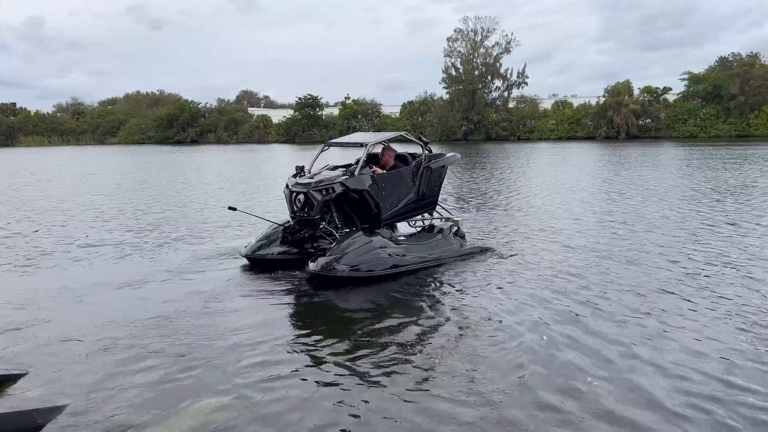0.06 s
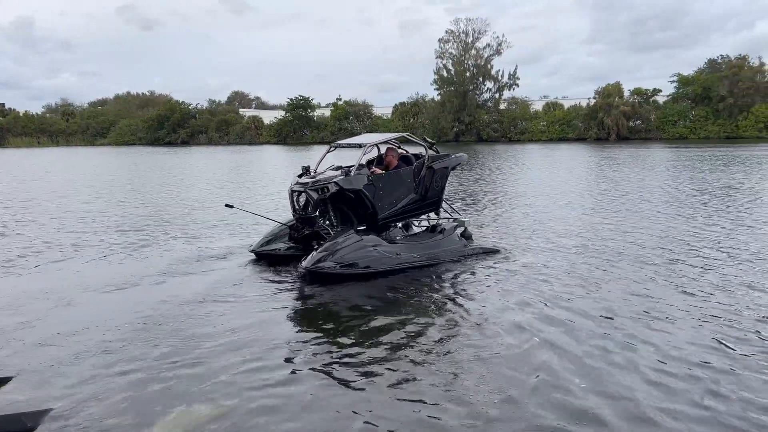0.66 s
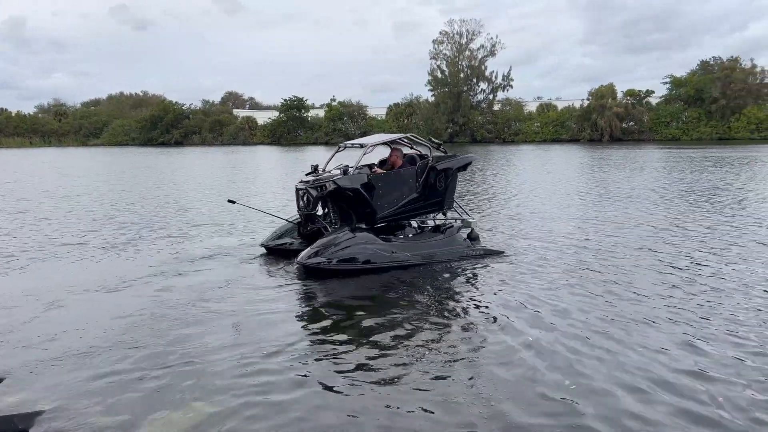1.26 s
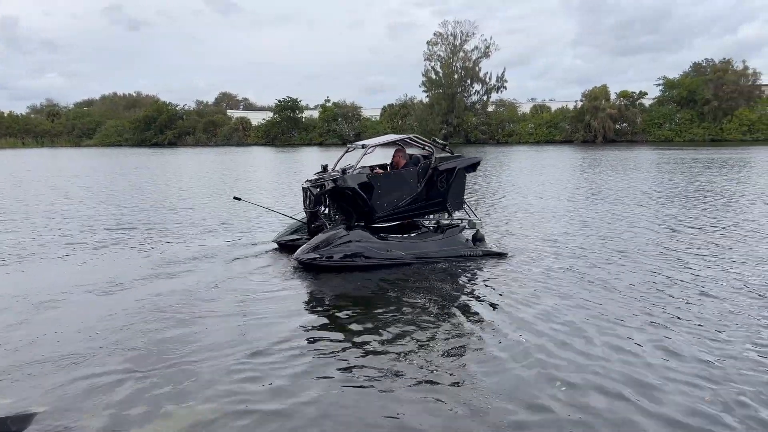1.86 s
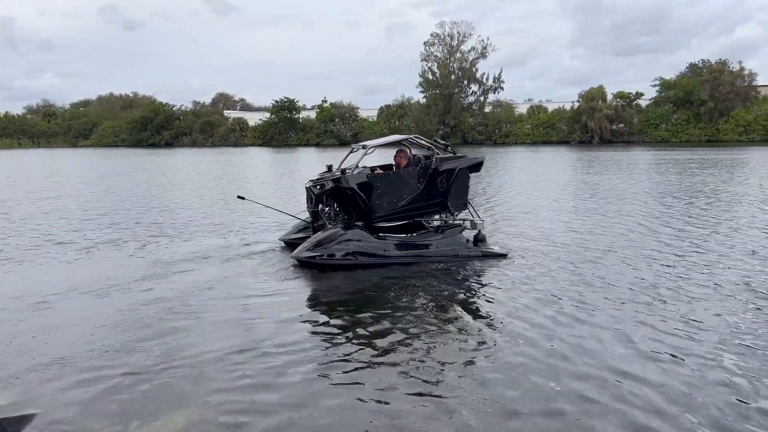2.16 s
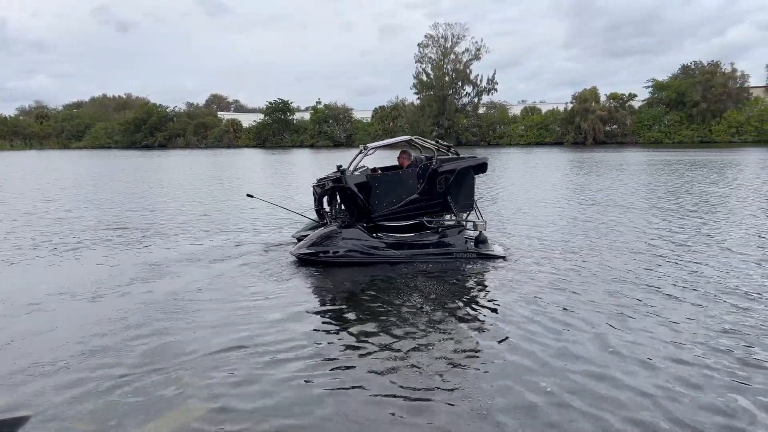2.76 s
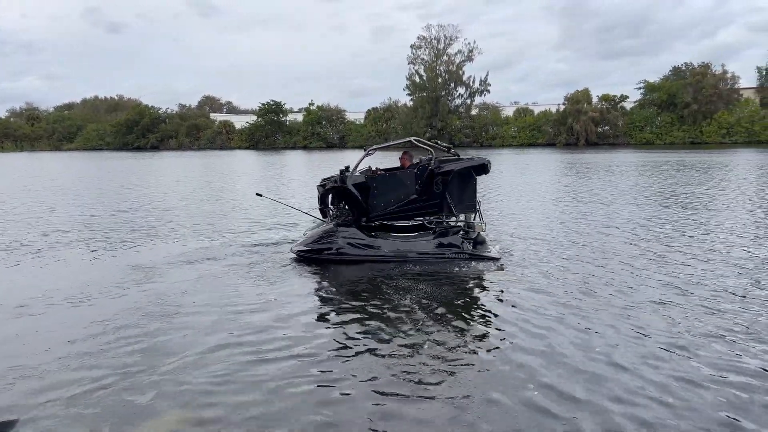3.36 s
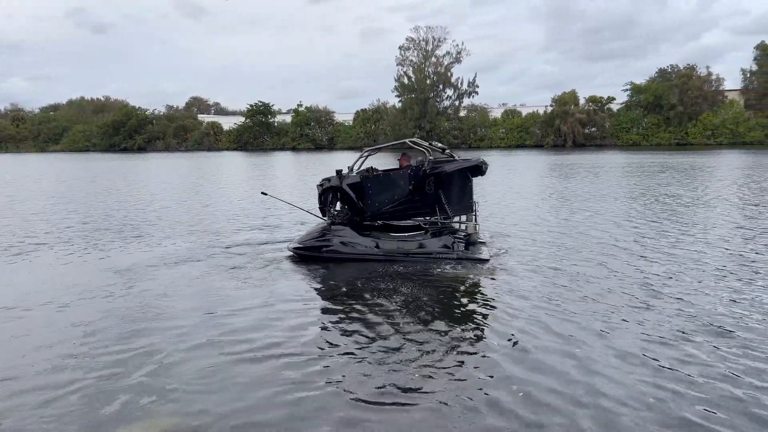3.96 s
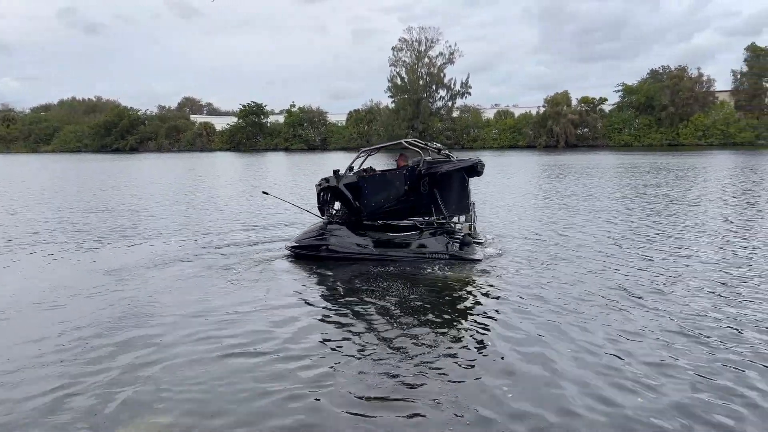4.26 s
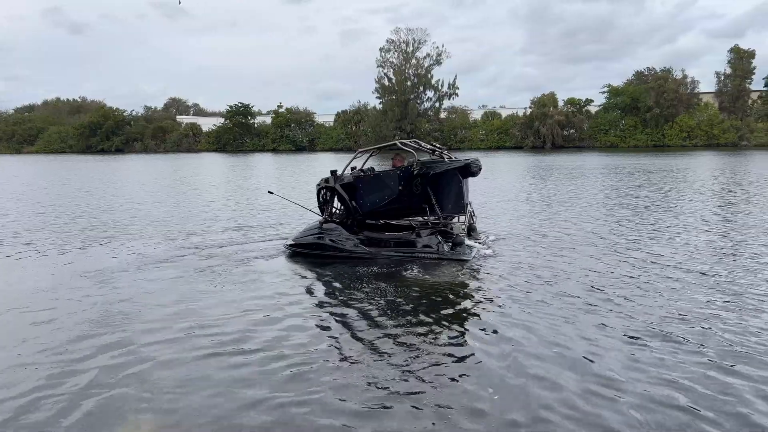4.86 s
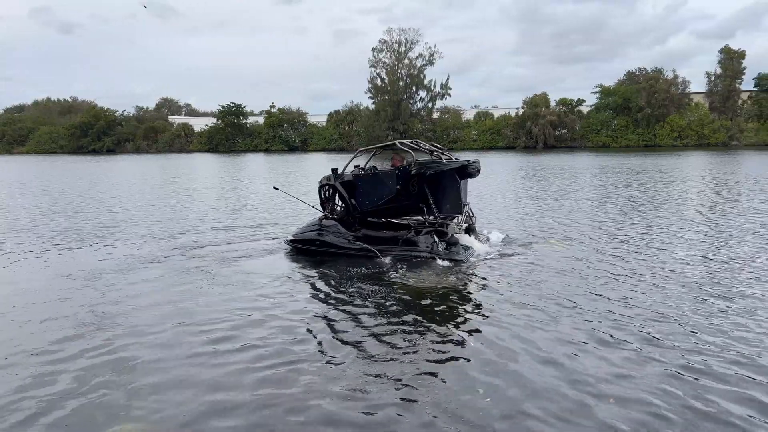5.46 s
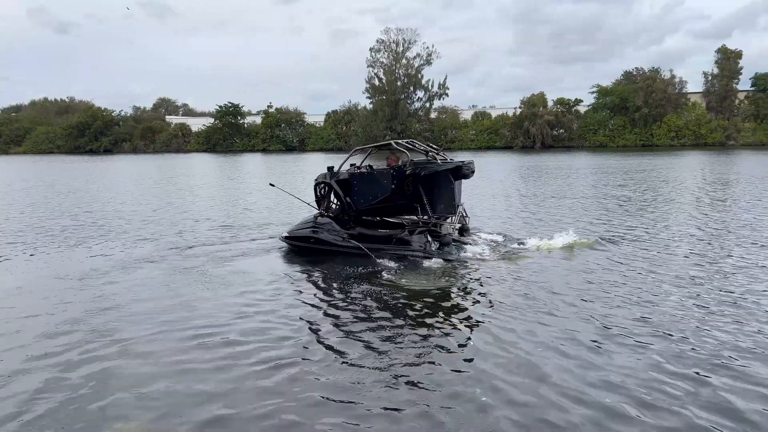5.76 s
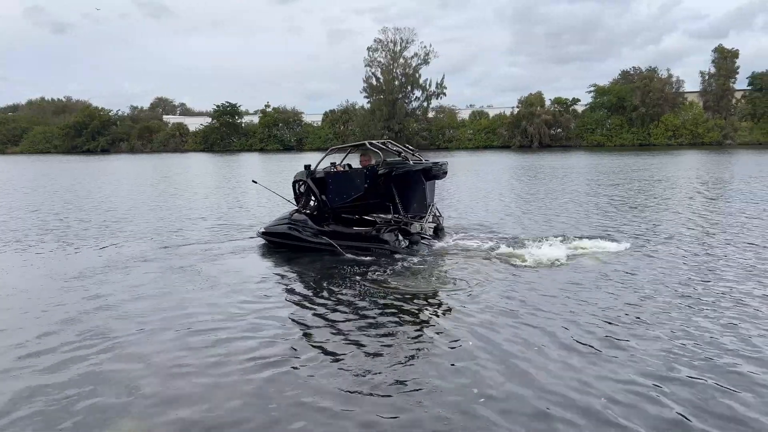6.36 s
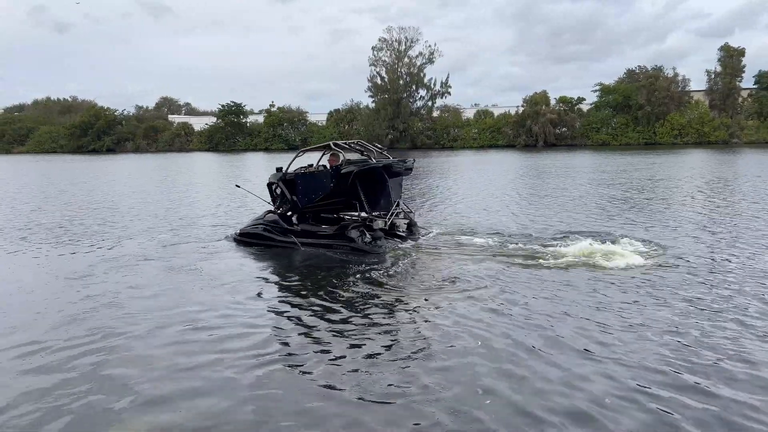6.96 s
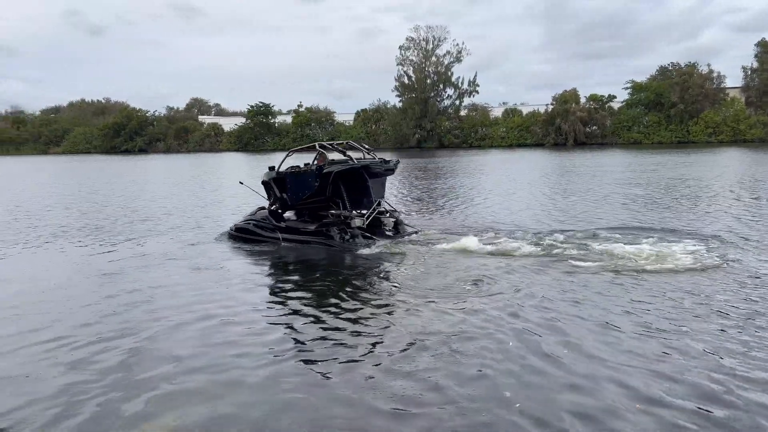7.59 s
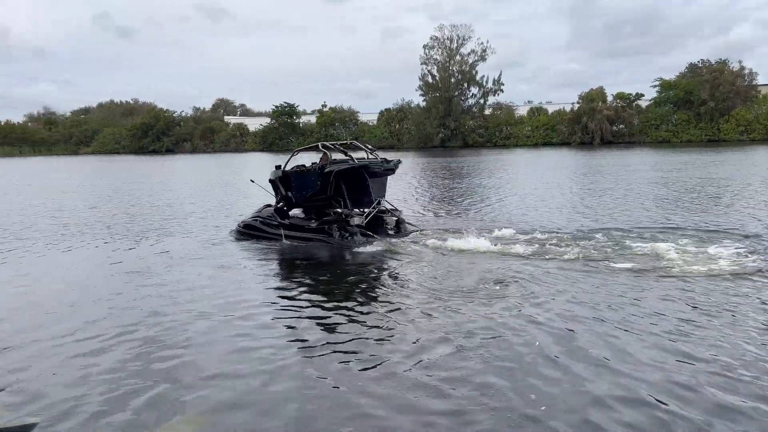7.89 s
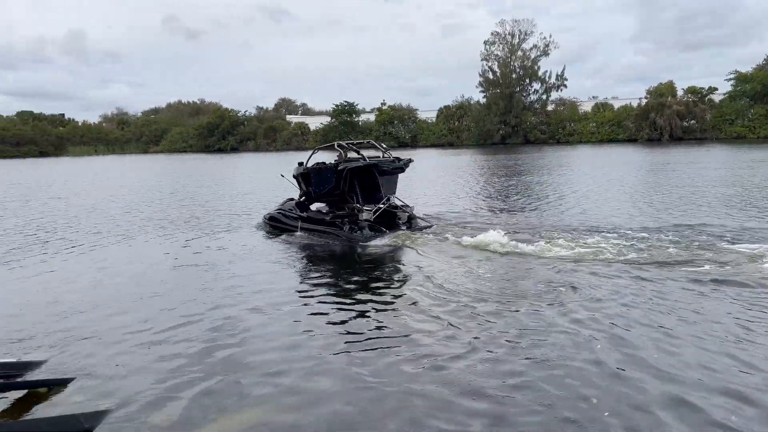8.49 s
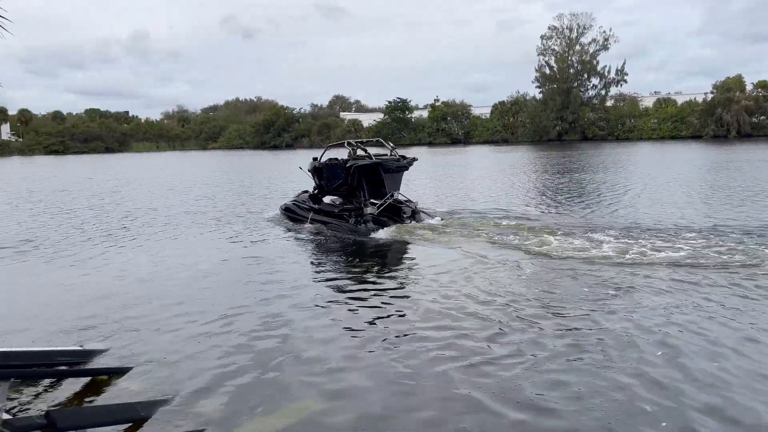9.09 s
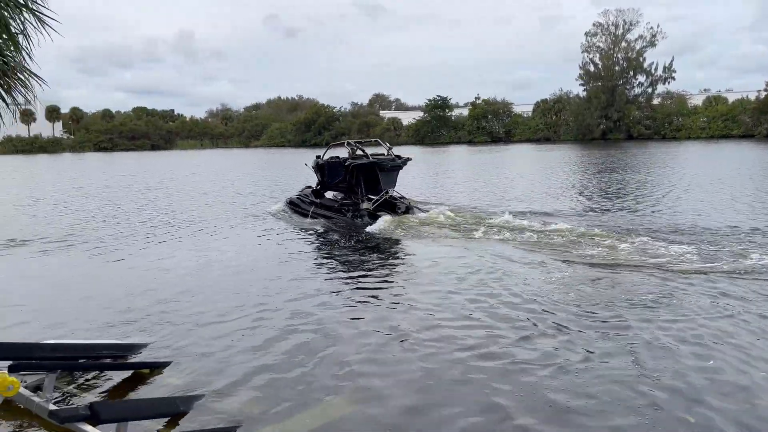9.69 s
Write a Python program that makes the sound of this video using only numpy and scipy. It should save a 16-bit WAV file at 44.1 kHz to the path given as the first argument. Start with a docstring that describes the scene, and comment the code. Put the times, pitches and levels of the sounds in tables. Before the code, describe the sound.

Two watercraft engines burble at a lumpy idle on a lake, rev up in steps, then pull away on a higher note with spray.

```python
"""Two engines burble down to a lumpy idle, heard from a lake shore on a phone's two microphones.
They drive a buggy body on two water-scooter hulls, which is revved in steps and pulls away.
The engines never quite agree, so their exhaust notes beat; at low speed the outlets bubble in the water.
Engine clatter rings the hulls, the jets throw spray, a pump sings faintly, drops tick and wavelets slap.
The phone limits the peaks."""
import sys
import numpy as np
from scipy import signal
from scipy.fft import rfft, irfft
from scipy.io import wavfile
from scipy.ndimage import uniform_filter1d, minimum_filter1d

SR = 44100
rng = np.random.default_rng(int(sys.argv[2]) if len(sys.argv) > 2 else 0)


def to_wav(s):
    """Save 16-bit WAV."""
    ch = np.atleast_2d(s).T  # columns
    pcm = np.round(np.clip(ch, -1, 1) * 32767)  # PCM
    wavfile.write(sys.argv[1], SR, pcm.astype(np.int16))


N = 429093
T = np.arange(N) / SR
IDLE_HZ = 50  # firing rate


def undb(db):
    """Decibels to gain."""
    return 10 ** (np.asarray(db) / 20)


def curves(table):
    """Each column of a table, joined by straight lines in time."""
    s, *columns = np.transpose(table)
    return [np.interp(T, s, column) for column in columns]


def swell(peak_s, rise_s, fall_s):
    """Rises from 0 to 1 and falls back."""
    return np.interp(T, [peak_s - rise_s, peak_s, peak_s + fall_s], [0, 1, 0])


def delayed(x, lag_s):
    """The same sound a little later."""
    return np.interp(T - lag_s, T, x, left=0)


def colour(x, points):
    """Causal filter through (Hz, dB) points, built from the cepstrum of its log gain."""
    size = 8192
    hz, db = np.transpose(points)
    bin_hz = np.arange(size // 2 + 1) * SR / size
    gain = undb(np.interp(np.log(bin_hz + 1), np.log(hz), db))
    cepstrum = irfft(np.log(gain))
    cepstrum[1:size // 2] *= 2
    cepstrum[size // 2 + 1:] = 0
    return signal.oaconvolve(x, irfft(np.exp(rfft(cepstrum))))[:N]


def steady(x, size=16384):
    """Scale to a running rms of 1."""
    return x / np.sqrt(uniform_filter1d(uniform_filter1d(x ** 2, size), size) + 1e-18)


def walk(per_s):
    """Smooth random wander with a spread near 1."""
    hold = int(SR / per_s)
    steps = np.repeat(rng.standard_normal(N // hold + 1), hold)[:N]
    return np.sqrt(2) * uniform_filter1d(uniform_filter1d(steps, hold), hold)


def grains(per_s, spread_db):
    """Clicks at random moments and of random sizes."""
    count = int(per_s * N / SR)
    size, loudness = rng.standard_normal((2, count))
    clicks = np.bincount(rng.integers(0, N, count), size * undb(spread_db * loudness), N)
    return clicks / np.std(clicks)


# Width at the microphones. Each row: frequency in Hz, gain of the scattered sound in dB.
STEREO_WIDTH = [(60, 3.5), (150, -15), (300, -14), (700, -4.5), (1500, -3.5), (3000, -3.5), (6000, 0),
                (12000, 1)]


def at_mics(direct, scattered):
    """Direct sound is shared and reaches the left microphone first; scattered sound differs."""
    side = colour(scattered, STEREO_WIDTH)
    return np.array([direct + side, np.pad(direct - side, (1, 0))[:N]])


# Lumpy and half drowned at idle; on a sudden throttle every other firing is weak (lope).
# Each row: time in seconds, then roughness, share of the bark under water and lope, all from 0 to 1.
ENGINE_MANNER = [(0, .3, .7, .2), (.4, .35, .75, .2), (.6, .52, .84, .2), (3.4, .5, .84, .2),
                 (4.3, .5, .72, .2), (5.0, .45, .68, .2), (5.17, .3, .48, .5), (5.3, .4, .5, .6),
                 (5.43, .4, .42, .85), (5.58, .42, .65, .3), (5.74, .3, .5, .3), (5.86, .16, .3, .45),
                 (6.2, .2, .36, .6), (6.55, .48, .55, .2), (6.8, .32, .42, .1), (7.3, .3, .34, .1),
                 (7.62, .36, .55, .1), (7.85, .11, .23, .05), (8.3, .1, .21, .05), (8.7, .12, .3, .12),
                 (9.73, .12, .28, .12)]


def firings(cycles, rough, scatter=.9, jitter_cycles=.06, lope=.32, open_share=.23):
    """A port opens once a cycle, strong and weak in turn; rough running scatters size and timing."""
    count, phase = np.divmod(cycles + jitter_cycles * rough * walk(70), 1)
    chance = rng.uniform(-1, 1, 2000)[count.astype(int)]
    size = np.maximum(1 + rough * (scatter * chance + lope * np.cos(np.pi * count)), 0)
    return size * np.sin(np.pi * np.minimum(phase / open_share, 1)) ** 2


def puffs(pulses, decay_s):
    """The gas pressure that follows each firing and dies away."""
    return steady(signal.lfilter([1], [1, -np.exp(-1 / (decay_s * SR))], pulses))


# The silencers, the pipes and gas in water. Each row: frequency in Hz, gain in dB.
SILENCER_RESPONSE = [(18, -39.5), (33, -19.5), (47, -1.5), (70, 5.5), (105, 1.5), (122, -0.5), (150, -24.5),
                     (220, -28), (500, -70)]
PIPE_RESPONSE = [(70, -35), (115, -11), (140, 1), (180, 3), (212, 0), (262, -6.5), (300, 0), (330, -1),
                 (355, -9), (400, -18.5), (500, -14), (600, -11.5), (730, -7.5), (1000, -26.5), (2500, -59)]
BURBLE_RESPONSE = [(30, -31), (70, -6.5), (120, 0), (150, -2.5), (195, 2), (250, 0.5), (310, -7), (370, -8),
                   (450, -17), (700, -34.5), (2000, -75.5)]
# Which outlet the shore hears more as the craft turns.
# Each row: time in seconds, the second engine's boom and its bark in dB over the first's.
OUTLET_BALANCE = [(.55, -2, -2), (1, -5, -5), (3.3, -6, -5), (3.7, -1.5, -3), (4.2, -6, -3),
                  (5.0, -6, -7.5), (5.3, -5, -6), (5.8, -7, -7), (6.9, -4, -5), (7.6, -4.5, -5),
                  (8.3, -9, 0.5), (8.75, -6, 2.5), (9.35, -10, 2.5), (9.6, -4.5, -2)]


def exhausts(lead, second, cycles, boom_db, bark_db):
    """Firings boom in the silencers and bark in the pipes; drowned outlets bubble through water."""
    rough, wet, lope = curves(ENGINE_MANNER)
    second_boom_db, second_bark_db = curves(OUTLET_BALANCE)
    pulses = lead + undb(second_boom_db) * second
    boom = steady(colour(pulses - pulses.mean(), SILENCER_RESPONSE)) * undb(boom_db)
    bank_echo = undb(-18) * delayed(boom, lag_s=.031)
    outlets = lead * (1 + lope * np.cos(np.pi * cycles)) + undb(second_bark_db) * second
    choke = undb(4 * rough * walk(14))  # water washes over the outlets
    bark = steady(colour(outlets - outlets.mean(), PIPE_RESPONSE) * choke)
    chug = 1 + .7 * rough * np.cos(np.pi * cycles / 2)  # a gulp of gas once in four firings
    gas = puffs(np.sqrt(outlets) * chug, decay_s=.017)
    burble, scattered = (steady(colour(gas * grains(per_s=3000, spread_db=1), BURBLE_RESPONSE))
                         for _ in range(2))
    pipes = at_mics(np.sqrt(1 - wet ** 2) * bark + wet * burble, undb(5.5) * wet * scattered)
    return at_mics(boom, bank_echo) + pipes * undb(bark_db)


# The hulls' modes. Each row: pitch in Hz, seconds to fade by 60 dB, level in dB against the rattle,
# share by which the pitch rises per doubling of engine speed.
HULL_RESONANCES = [(690, 0.075, -13.5, -.03), (804.6, .075, -14.5, 0), (1100, .03, -13.5, .2),
                   (1960, 0.037, -27, 0), (2790, 0.07, -24.5, 0)]


def hull_ring(knocks, octaves):
    """Knocks ring the hull modes, whose pitch wanders slightly; some shift with speed."""
    out = 0
    for hz, t60, db, rise in HULL_RESONANCES:
        pole = np.exp(-np.log(1000) / (t60 * SR))
        envelope = signal.lfilter([1], [1, -pole], knocks * np.exp(-2j * np.pi * hz * T))
        pitch = hz * (1 + rise * octaves + .008 * walk(4))
        tone = np.exp(2j * np.pi * np.cumsum(pitch) / SR)
        out = out + steady(np.real(envelope * tone)) * undb(db)
    return out


# The rattle through the hulls. Each row: frequency in Hz, gain in dB.
HULL_RESPONSE = [(200, -18.5), (450, -6), (580, -2), (700, 0.5), (830, 0), (975, -9.5), (1150, -6),
                 (1400, -11.5), (1900, -23.5), (2700, -32), (3300, -32.5), (8000, -60)]


def clatter(gas, hz, clatter_db):
    """Valve gear and combustion knock rattle the hulls, hardest just after each firing."""
    drive = (1 + .095 * gas) * undb(.5 * walk(14))
    rattle, scattered = (steady(colour(drive * grains(per_s=7000, spread_db=2), HULL_RESPONSE))
                         for _ in range(2))
    ring = hull_ring(gas * grains(per_s=600, spread_db=1), np.log2(hz / IDLE_HZ))
    return at_mics(rattle + ring, scattered) * undb(clatter_db)


# Droplets and fine mist behind the jets. Each row: frequency in Hz, gain in dB.
DROPLET_SPECTRUM = [(700, -28), (1400, 7.5), (2000, 9), (2700, 5.5), (3200, 1), (4200, -1), (5300, -3.5),
                    (6500, -2.5), (7500, -9.5), (9000, -11), (12000, -55), (16000, -21)]
MIST_SPECTRUM = [(4000, -26), (8000, -30), (11500, 31), (15500, 7)]


def spray(gas, hz, spray_db):
    """The jets churn the surface into droplets; fine mist comes with pump speed."""
    drive = (1 + .084 * gas) * undb(.68 * walk(25))
    drops = [steady(colour(drive * grains(per_s=13000, spread_db=0), DROPLET_SPECTRUM)) for _ in range(2)]
    mist = [steady(colour(drive * grains(per_s=8900, spread_db=.5), MIST_SPECTRUM)) for _ in range(2)]
    thrust = np.clip(hz / 78, 0, 1) ** 3
    return (at_mics(*drops) * undb(3.5) + at_mics(*mist) * thrust * undb(-15)) * undb(spray_db)


def off_water(sound, lag_s, share):
    """The lake mirrors the craft: direct and reflected sound comb into a hollow tone at the shore."""
    return np.array([x + share * delayed(x, lag_s) for x in sound]) / np.hypot(1, share)


# The pump at idle. Each row: time in seconds, rate in Hz, second and third harmonic in dB.
PUMP_WHINE = [(.3, 179.5, -45, -60), (.6, 180.2, -43, -60), (1.4, 183.6, -40.5, -55),
              (1.7, 186.2, -39.5, -42), (1.9, 187.5, -50, -33.5), (2.3, 190, -52, -45.5),
              (2.62, 191, -54, -38), (2.8, 192.2, -42, -54), (3.05, 194.8, -40.5, -56),
              (3.5, 195.6, -72, -75)]


def pump():
    """A pump sings a thin, slightly wavering tone on its second and third harmonics."""
    hz, second_db, third_db = curves(PUMP_WHINE)
    phase = 2 * np.pi * np.cumsum(hz * (1 + .0028 * walk(30))) / SR
    harmonics = [np.sin(k * phase) * undb(db + 2 * walk(13)) for k, db in ((2, second_db), (3, third_db))]
    return np.sqrt(2) * sum(harmonics)


def gurgles(per_s, low_hz, high_hz, cycles, glide, spread_db):
    """Single bubbles burst in the wash: each rings for some cycles and glides upward."""
    out = np.zeros((2, N + SR))
    t = np.arange(SR // 25) / SR
    for when, pitch, faintness, pan in rng.random((int(per_s * N / SR), 4)):
        hz = low_hz * (high_hz / low_hz) ** pitch
        age = t * hz / cycles
        bubble = np.sin(2 * np.pi * hz * t * (1 + glide * np.tanh(age))) * np.exp(-age)
        gains = np.sqrt([pan, 1 - pan]) * undb(-spread_db * faintness)
        start = int(when * N)
        out[:, start:start + len(t)] += np.outer(gains, bubble)
    return out[:, :N]


# Sheets of water thrown by the jets. Each row: peak time, rise and fall in seconds, level in dB.
WATER_SHEETS = [(.22, .4, 0.32, -24.5), (5.45, .07, 0.12, -16.5), (5.7, .1, .1, -21),
                (6.35, 0.083, .07, -22), (7.6, 0.21, .1, -19.5)]


def splashes():
    """Each sheet of thrown water falls back as a dense patter of short bubbles."""
    falling = sum(swell(*timing) * undb(db) for *timing, db in WATER_SHEETS)
    return falling * gurgles(per_s=330, low_hz=1140, high_hz=2990, cycles=5.4, glide=.075, spread_db=15)


def add_burst(out, s, db, hz, decay_s, low, high):
    """Mix in a burst of noise that dies away, in a band from low to high times its pitch."""
    t = np.arange(SR // 8) / SR
    band = signal.butter(2, [hz * low, hz * high], "band", fs=SR, output="sos")
    shared, side = signal.sosfilt(band, rng.standard_normal((2, len(t))) * np.exp(-t / decay_s))
    burst = np.array([shared + .5 * side, shared - .5 * side])
    start = int(s * SR)
    out[:, start:start + len(t)] += burst / np.abs(burst).max() * undb(db)


# Single drops. Each row: start in seconds, peak in dB before a shared trim, pitch in Hz.
WATER_DROPS = [(1.571, -27, 7800), (2.144, -27, 5440), (2.605, -29, 5997), (3.264, -36, 6660),
               (3.606, -25.5, 6570), (5.008, -25, 6546)]
# Wavelets on the hulls. Each row: start in seconds, peak in dB, pitch in Hz, decay in seconds.
HULL_SLAPS = [(2.79, -29, 1500, .012), (3.344, -25.5, 2100, .007), (3.42, -25, 2055, .008),
              (3.793, -26, 2000, .006), (4.513, -20, 1894, 0.0047), (4.76, -27, 2202, .005),
              (5.664, -23, 1803, .008), (5.917, -11, 1490, 0.0055), (5.98, -22.5, 2306, .014),
              (6.139, -18, 1990, .014), (6.346, -22, 1651, .022), (7.232, -14.5, 740, .022),
              (9.267, -28, 1700, .006)]


def drops_and_slaps():
    """Drops tick high and short; wavelets slap the hulls lower, broader and mostly for longer."""
    out = np.zeros((2, N))
    for s, db, hz in WATER_DROPS:
        add_burst(out, s, db - 4.5, hz, decay_s=.0053, low=.82, high=1.14)
    for s, db, hz, decay_s in HULL_SLAPS:
        add_burst(out, s, db, hz, decay_s, low=.68, high=1.21)
    return out


# The craft turns its stern to the shore and draws away from the microphones.
# Each row: time in seconds, then gains in dB for boom, for bark, and for clatter and spray together.
COURSE_GAINS = [(0, -3, 1.5, 2), (.42, -4.5, -1, 0.5), (.56, -4, 0, -.5), (3.4, -0.5, -0.5, 0),
                (3.95, -0.5, 1, -0.5), (4.15, 2, 0.5, -0.5), (4.6, -1, 1, 0), (5.3, -3, 1, 0.5),
                (5.9, -1.5, 2, 0.5), (6.8, 1.5, 2.5, 1.4), (7.62, 1, 0.5, 1.5), (8.15, 1.5, 5, -2.5),
                (8.7, 0, 0, -4.5), (9.4, 2, 0, -4.5), (9.73, -1.5, 1.5, -7)]
# The boom swells towards the silencers' resonance. Each row: firing rate in Hz, level in dB.
BOOM_BY_RATE = [(49, -18), (59, -14), (69, -10.5), (87, -7), (106, -7), (120, -6)]
# Brief swells and dips in the boom, bark, clatter and spray.
# Each row: peak time, rise and fall in seconds, then gains in dB for those four in turn.
SWELLS_AND_DIPS = [(.15, .2, .35, 0.5, 1, -1, 0), (3.75, 0.09, 0.11, 5.5, 0.5, 0.5, -3.5),
                   (5.26, 0.16, 0.051, -5, 2.5, 2, -4.5), (5.34, .05, 0.048, -9, -3, -0.5, -2.5),
                   (5.41, 0.055, 0.11, -6, 9, 4, 2), (5.44, 0.034, 0.059, 0, -0.5, -0.5, 1.5),
                   (5.66, 0.22, .12, 1.5, 0, 0.5, 2), (5.79, 0.068, 0.043, -1, -1.5, 1.5, 2),
                   (6.28, 0.17, 0.26, 0.5, 0, 1.5, 1.5), (6.53, .07, 0.1, -10, 1, -2, 1.5),
                   (6.85, 0.16, 0.12, 1, -3.5, -5, -1.5), (7.0, 0.07, 0.078, 1.5, 5.5, -0.5, -0.5),
                   (7.24, 0.095, 0.12, -1, 7, -1, 2), (7.59, 0.36, 0.11, -3, -1.5, 1.5, 3)]


def levels(hz):
    """Boom, bark, clatter and spray in dB, from course, engine speed, load and brief swells and dips."""
    boom_db, bark_db, wash_db = curves(COURSE_GAINS)
    octaves = np.log2(hz / IDLE_HZ)
    hz_per_s = uniform_filter1d(np.gradient(hz) * SR, int(.16 * SR))
    load = np.tanh(hz_per_s / 77)  # an opening throttle loads the engines, a closing one eases them
    squat = swell(peak_s=5.85, rise_s=.047, fall_s=.17)  # the stern squats and buries the jets
    boom_db += np.interp(hz, *np.transpose(BOOM_BY_RATE)) + 2 * load
    bark_db += -23.34 + 6 * octaves + 2 * load + 2 * squat
    clatter_db = wash_db - 30.95 + 4.5 * octaves + .7 * load - 7 * squat
    spray_db = wash_db - 46 + 6.5 * octaves - 9 * squat
    swells_db = sum(np.outer(gains_db, swell(peak_s, rise_s, fall_s))
                    for peak_s, rise_s, fall_s, *gains_db in SWELLS_AND_DIPS)
    return np.array([boom_db, bark_db, clatter_db, spray_db]) + swells_db


# The leading engine's speed. Each row: time in seconds, firing rate in Hz.
FIRING_RATE = [(0, 68.45), (.36, 59.8), (.8, 49.52), (1.2, 46.98), (1.85, 49.28), (2.3, 48.53),
               (2.52, 58.2), (2.74, 58.5), (2.87, 49.1), (3.35, 47.83), (3.75, 49.75), (3.97, 49.06),
               (4.07, 58.96), (4.19, 61.97), (4.29, 69.88), (5.0, 65), (5.08, 73.06), (5.17, 100),
               (5.32, 107.4), (5.41, 121), (5.54, 88.96), (5.73, 85), (5.8, 95.03), (5.88, 106.9),
               (6.3, 93.24), (6.48, 78), (6.6, 73.6), (7.22, 68.48), (7.5, 78.8), (7.78, 88.16),
               (8.38, 91.25), (8.64, 109.4), (9.48, 103.8), (9.73, 116.5)]
# The second engine slips behind; half a cycle out of step, the two booms partly cancel.
# Each row: time in seconds, lag in firing cycles.
ENGINE_SLIP = [(0, .8), (.103, 1.5), (.245, 2.5), (.42, 3.5), (.62, 4.5), (.95, 5.5), (1.3, 5.75),
               (1.45, 6.4), (1.62, 6.55), (1.85, 7), (2.15, 7.5), (2.45, 8), (2.75, 8.1), (2.93, 8.5),
               (3.1, 9), (3.4, 9.1), (3.6, 9.42), (3.85, 9.55), (4.28, 10), (4.6, 10.2), (4.99, 10.4),
               (5.12, 11.5), (5.33, 12.5), (5.46, 13.5), (5.57, 14), (5.78, 14.15), (5.91, 14.5),
               (6.08, 14.9), (6.29, 15.05), (6.375, 15.5), (6.54, 16.5), (6.966, 17.5), (7.234, 18.5),
               (7.471, 19.5), (7.694, 20.5), (7.79, 20.95), (8.25, 21.1), (8.457, 21.5), (8.631, 22.5),
               (8.73, 23.5), (8.833, 24.5), (8.977, 25.5), (9.135, 26.5), (9.336, 27.5), (9.585, 28.5),
               (9.73, 29.8)]


def scene():
    """The craft as heard from the shore: two engines on one throttle, and the water around them."""
    (hz,), (lag,), (rough, _, _) = curves(FIRING_RATE), curves(ENGINE_SLIP), curves(ENGINE_MANNER)
    boom_db, bark_db, clatter_db, spray_db = levels(hz)
    cycles = np.cumsum(hz) / SR
    slip = uniform_filter1d(lag, size=2048, mode="nearest")
    lead, second = firings(cycles, rough), firings(cycles - slip, rough)
    gas = puffs(lead + second, decay_s=.0099)
    wash = off_water(clatter(gas, hz, clatter_db) + spray(gas, hz, spray_db), lag_s=.001532, share=.14)
    engines = exhausts(lead, second, cycles, boom_db, bark_db) + pump()
    bubbles = gurgles(per_s=22, low_hz=1100, high_hz=3000, cycles=9, glide=.06, spread_db=13)
    return engines + wash + bubbles * undb(spray_db + 14) + drops_and_slaps() + splashes()


# The phone's two microphones. Each row: frequency in Hz, left minus right in dB.
MIC_IMBALANCE = [(100, 1.5), (400, 2), (1300, 2.5), (2400, .5), (4400, 6), (7500, 9), (11000, -1)]


def record(dry):
    """The microphones differ in colour; a limiter holds peaks near full scale; the top is cut."""
    heard = np.array([colour(x, [(hz, sign * db / 2) for hz, db in MIC_IMBALANCE])
                      for x, sign in zip(dry, (1, -1))])
    headroom = 1 / np.maximum(np.abs(heard).max(axis=0), 1)
    gain = uniform_filter1d(minimum_filter1d(headroom, size=1024), size=1024)
    lowpass = signal.ellip(8, .1, 70, 16000, fs=SR, output="sos")
    return signal.sosfilt(lowpass, heard * gain)


dry = scene()
out = record(dry)
to_wav(out)
```